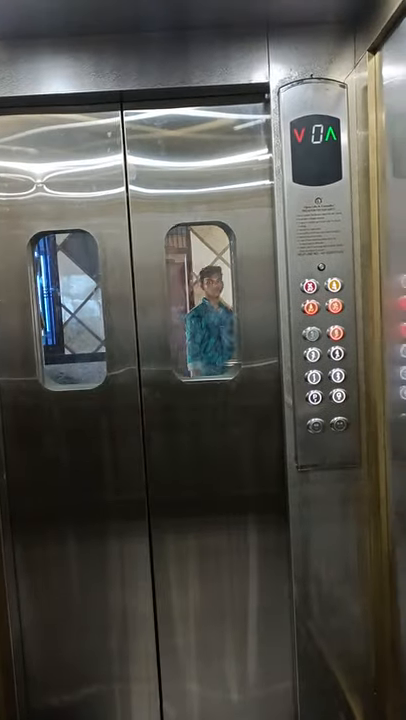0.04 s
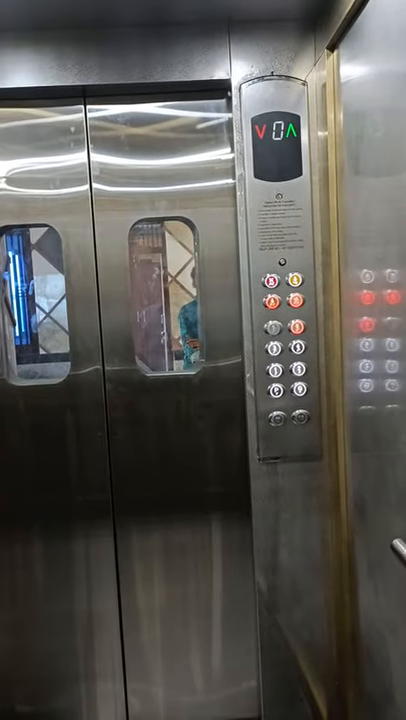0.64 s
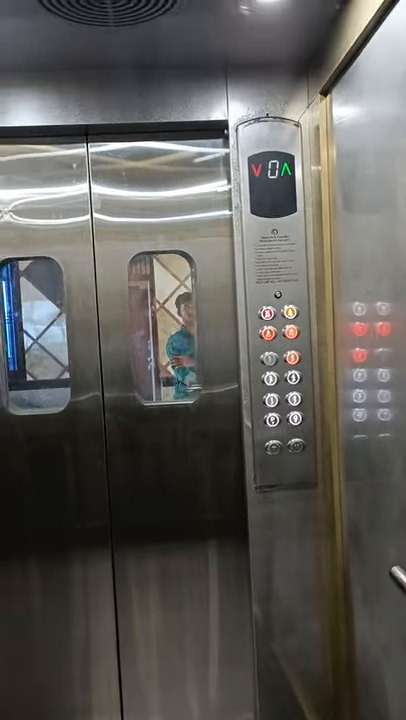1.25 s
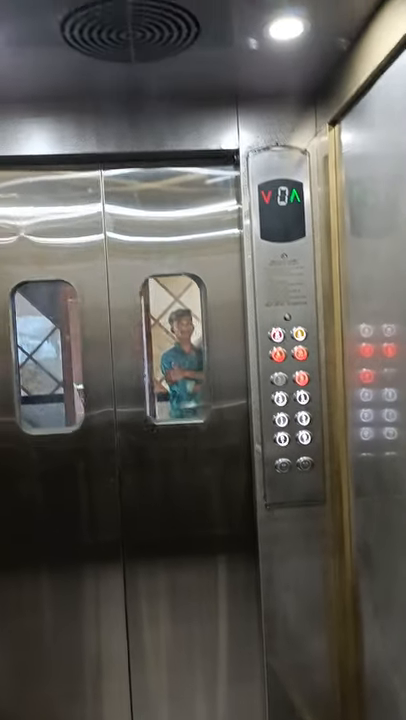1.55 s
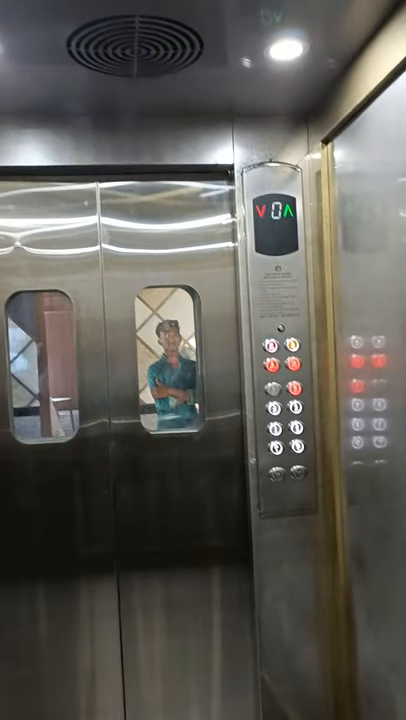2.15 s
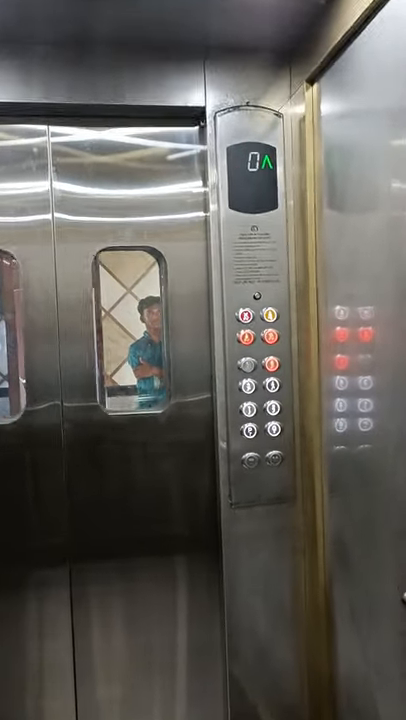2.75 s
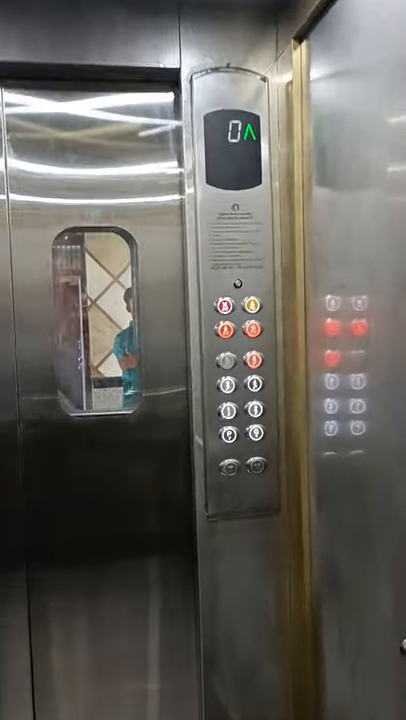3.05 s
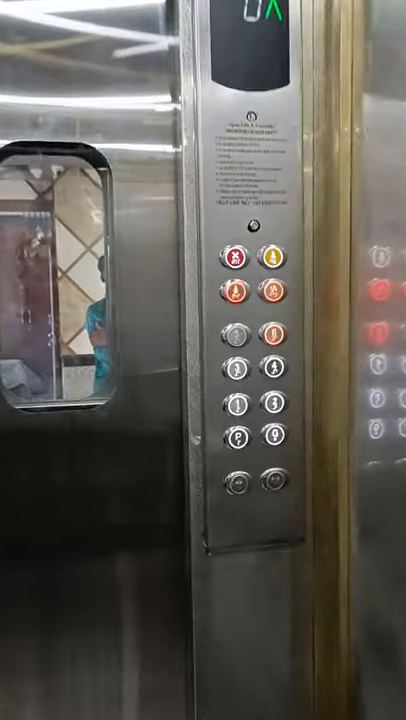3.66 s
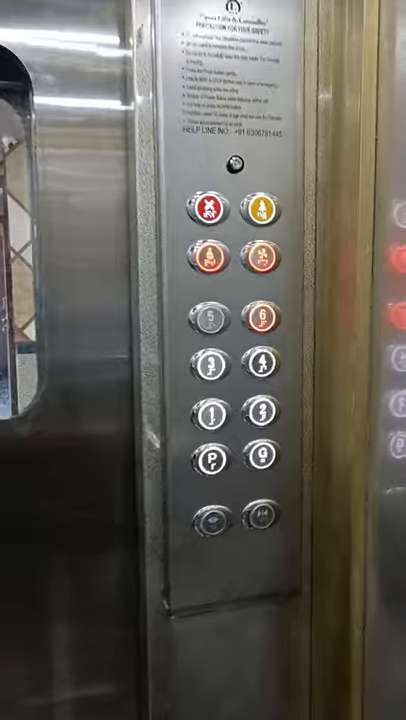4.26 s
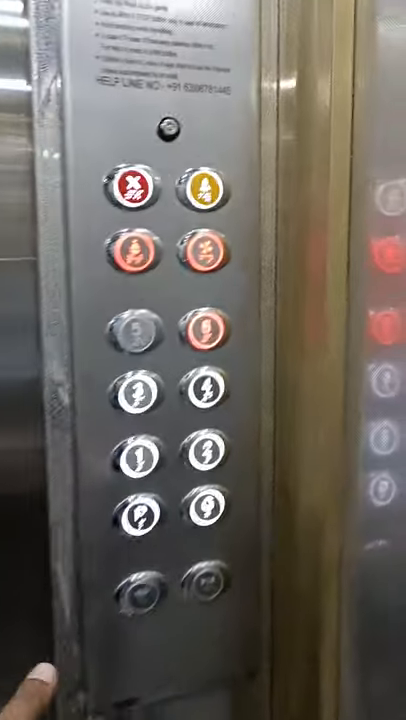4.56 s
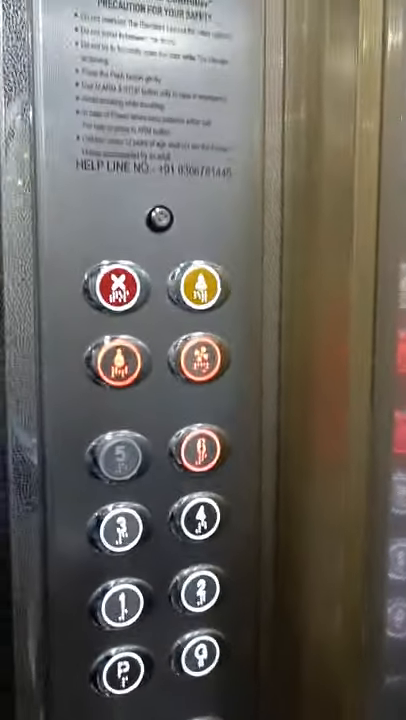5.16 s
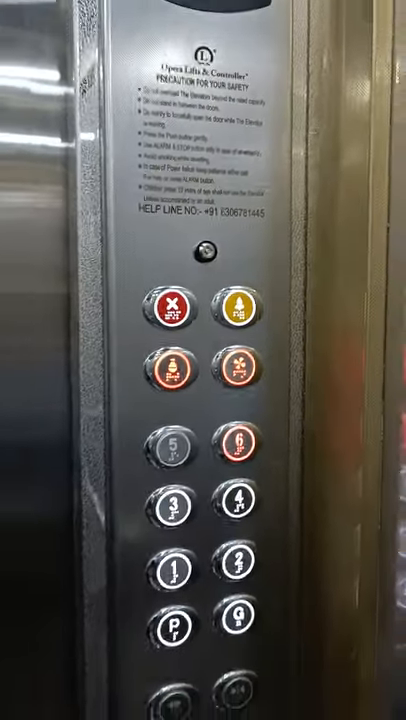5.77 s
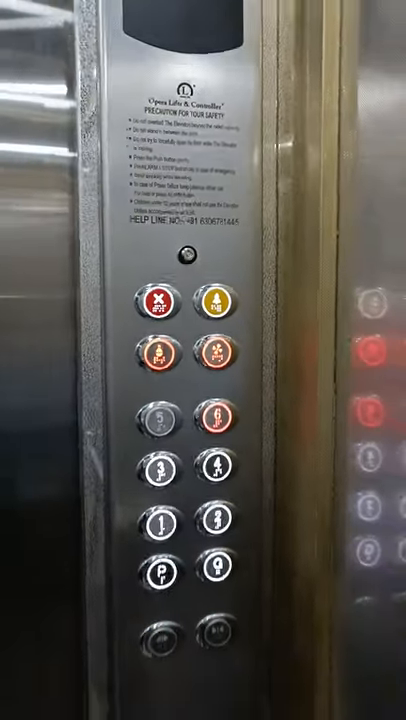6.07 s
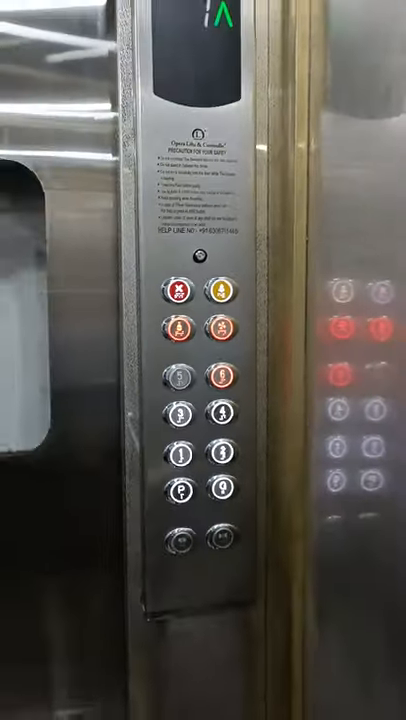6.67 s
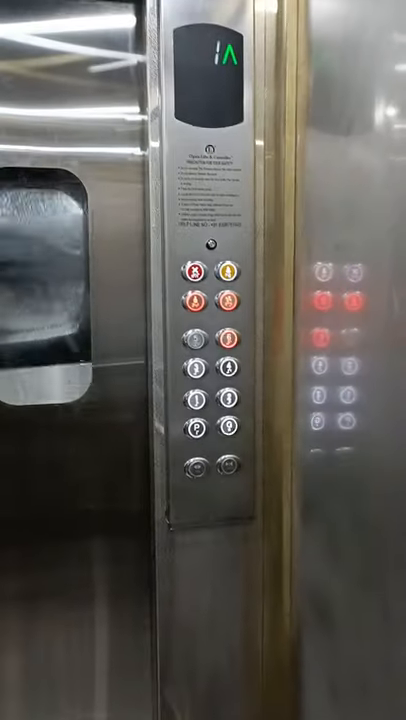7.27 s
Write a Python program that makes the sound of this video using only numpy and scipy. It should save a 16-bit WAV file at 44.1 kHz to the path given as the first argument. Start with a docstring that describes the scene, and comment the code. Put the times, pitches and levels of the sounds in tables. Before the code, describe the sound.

Inside a moving elevator, a low hum and rumble grow louder midway, joined by a couple of sharp ticks and brief clothing rustles.

```python
"""Inside a rising lift car

A motor hums at twice the mains frequency, with side tones from its rotation. The ride excites the
resonances of the small steel cabin, which rumbles while air rushes and hisses. The car shudders a
few times, knocks softly and squeaks once. Light impacts tick on the metal, and friction in
clothing makes rustles and short swishes, two of them close and loud."""
import sys
import numpy as np
from scipy import signal
from scipy.fft import rfft, irfft, next_fast_len
from scipy.io import wavfile

SR = 44100
rng = np.random.default_rng(int(sys.argv[2]) if len(sys.argv) > 2 else 0)


def inscribe(sig):
    """Save sig as 16-bit PCM at rate SR to the path in sys.argv[1].

    A 1-D sig is mono; a 2-D sig holds one channel per row.
    Samples are clipped to [-1, 1] before scaling.
    """
    pcm = np.round(np.clip(np.atleast_2d(sig).T, -1, 1) * 32767)
    wavfile.write(sys.argv[1], SR, pcm.astype(np.int16))


N = 326781
TIME = np.arange(N) / SR
SIZE = next_fast_len(N, True)
BINS = np.maximum(np.arange(SIZE // 2 + 1) * SR / SIZE, 1)   # f/Hz

# magnetic hum of the motor: t/s, level/dB
HUM_LEVEL = [(0.1, -25), (1.37, -25), (1.73, -27), (2.78, -26.5), (3.16, -24), (3.26, -26.5), (4.57, -23),
             (5.68, -18), (6.1, -20), (6.48, -29.5), (6.56, -26), (7.33, -24.5)]
# its weak overtones: harmonic number, level/dB relative to the hum
HUM_HARMONICS = [(2, -46), (3, -50)]
# upper side tone of the rotation: t/s, level/dB
UPPER_TONE_LEVEL = [(0, -44), (.7, -45), (1.5, -39.5), (2.15, -41), (2.75, -48.5), (3.45, -49.5),
                    (3.8, -43), (4.8, -37), (5.25, -38), (5.62, -32.5), (6.15, -42), (7.4, -41)]
# shudders of the car, which swell the lower side tone: t/s, peak level/dB
SHUDDER_PEAKS = [(0.6, -39.5), (0.87, -33.5), (2.27, -47), (2.73, -38.5)]
# two close machine notes that beat: t/s, level/dB
PAIR_LEVEL = [(0, -45), (0.7, -48), (0.95, -44), (1.9, -45.5), (2.4, -40.5), (2.65, -45.5), (4.25, -48.5),
              (4.7, -40), (5.55, -46.5), (6.5, -44), (7.4, -51)]
# rumble of the ride along the rails: t/s, relative level/dB
RUMBLE_LEVEL = [(0, -44.5), (0.35, -47), (0.85, -40.5), (2.1, -44), (4.22, -34.5), (4.5, -26), (4.95, -30),
                (5.35, -27), (5.7, -34), (6.35, -30.5), (6.65, -34), (7.4, -39.5)]
# cabin resonances: f/Hz, width/Hz, relative level/dB
RUMBLE_MODES = [(135, 31, -7.5), (164, 11, -0.5), (191.9, 16, 1), (204, 17, -2.5), (235.3, 34, -9.5),
                (270, 20, -16)]
# wall panel resonances: f/Hz, width/Hz, relative level/dB
WALL_MODES = [(324.3, 8.5, -3), (353.4, 8.6, 0), (380.7, 8.1, 2.5), (428, 11.8, 3.5), (857, 26, -11.5),
              (1229, 110, -15)]
# resonances of the hollow drone: f/Hz, width/Hz, relative level/dB
HOLLOW_MODES = [(512.5, 9.4, 3.5), (546, 8.6, 1.5)]
# moving air: f/Hz, relative spectral level/dB
AIR_SPECTRUM = [(20, -9), (48, -0.5), (65, 6), (130, 9), (240, 1), (340, 1.5), (470, -8), (560, -5.5),
                (660, -8.5), (1000, -13.5), (1600, -20), (2200, -20.5), (3000, -28.5), (4100, -27),
                (5600, -41.5), (10500, -47), (16000, -54)]
# thin hiss: f/Hz, relative spectral level/dB
HISS_SPECTRUM = [(5000, -23), (6100, -19), (6700, -8.5), (7400, -11.5), (7950, -4), (8400, -1), (9100, 1),
                 (9500, -9.5), (9900, -26), (13000, -43)]
# whistling edge of the hiss: t/s, level/dB
WHISTLE_LEVEL = [(0, -63.5), (2.25, -61.5), (2.6, -78.5), (4.5, -74.5), (6.1, -61.5), (7.4, -62)]
# rustling creases: f/Hz, relative spectral level/dB
RUSTLE_SPECTRUM = [(2000, -15), (3000, 1.5), (5500, -9.5), (7200, 3), (9000, -4), (10800, -7.5),
                   (15500, -19.5)]
# creases giving way: t/s, peak level/dB
CREASE_PEAKS = [(.22, -60), (2.83, -63), (2.98, -59), (3.16, -56), (3.32, -60.5), (3.57, -60), (3.67, -61),
                (5.96, -56.5), (6.6, -62), (7.28, -55.5)]
# dull panel rattle of the knock: f/Hz, width/Hz, relative level/dB
RATTLE_MODES = [(340, 120, 0.5), (550, 120, -4), (800, 270, -13.5)]
# strokes of cloth: start t/s, rise/s, length/s, level/dB, tilt/(dB per octave)
STROKES = [(0.503, .02, .07, -58, -1), (3.65, .005, .05, -55.5, -2.5), (4.071, .011, 0.12, -35.5, -1),
           (4.354, 0.018, .085, -56, 2), (4.721, 0.084, 0.23, -31.5, 1), (5.37, 0.062, 0.15, -44.5, -4),
           (5.787, .014, .075, -47.5, 3), (6.093, .025, 0.089, -57, 1), (6.196, .026, 0.11, -54.5, 0.5),
           (6.713, 0.023, 0.085, -44.5, -0.5), (6.8, .016, .061, -49.5, -1.5), (7.067, .015, .08, -55, 3.5)]
# sliding cloth: f/Hz, relative spectral level/dB
CLOTH_SPECTRUM = [(500, -17), (1100, -5.5), (1800, -5), (2170, 0), (2550, -2.5), (3300, 0), (4100, 2.5),
                  (4650, -2), (5800, -8), (6700, -7), (7400, -2), (8000, -2), (8600, -13), (9700, -9.5),
                  (15500, -16)]
# resonances of rubbing metal: f/Hz, width/Hz, relative level/dB
RUBBING_MODES = [(4285, 300, -1.5), (5100, 250, -0.5), (5800, 300, -3), (6100, 300, -4.5),
                 (7500, 3500, -9.5)]
# light contacts on the metal: t/s, relative level/dB
CONTACTS = [(0.905, -63), (3.651, -41.5), (3.658, -41), (4.072, -32), (4.099, -34), (5.804, -59),
            (6.235, -57.5)]
# clusters of close modes in the struck part: f/Hz, width/Hz, relative level/dB, T60/s
STRUCK_MODES = [(2070, 160, -9.5, 0.18), (3260, 400, -9.5, 0.044), (4070, 320, 0.5, 0.073),
                (4630, 450, -5.5, 0.087), (6900, 2000, -16.5, .02)]
# cabin field, coherent in the bass and diffuse above: f/Hz, side minus mid level/dB
FIELD_WIDTH = [(60, -19), (200, -14.5), (380, -8), (700, -2.5), (1290, 2), (2400, -0.5), (16000, 1.5)]
# unequal resonances of two microphone ports: f/Hz, left minus right level/dB
PORT_BALANCE = [(100, 2), (200, -0.4), (400, 0.2), (1200, -0.1), (2300, 2.5), (4100, -2.5), (5700, 1.5),
                (6500, 9.5), (7500, 25), (8800, 15), (9700, 11), (11000, 6), (14000, 2)]


def from_db(db):
    """Amplitude grows tenfold for every 20 dB."""
    return 10 ** (np.asarray(db) / 20)


def rms_one(x):
    """Division by the RMS amplitude gives unit power."""
    return x / np.sqrt(np.mean(x ** 2) + 1e-20)


def in_time(rows):
    """Linear interpolation gives a level/dB at every sample."""
    return np.interp(TIME, *np.transpose(rows))


def over_hz(points):
    """Interpolation of level over log frequency gives a gain for every bin."""
    hz, db = np.transpose(points)
    return from_db(np.interp(np.log(BINS), np.log(hz), db))


def coloured(x, gain):
    """Filtering multiplies the spectrum by a gain."""
    return irfft(rfft(x.astype(np.float32), SIZE) * gain.astype(np.float32), SIZE)[..., :N]


def resonance(hz, width):
    """A resonator's response, 1 at its natural frequency, falls steeply on either side."""
    return 1 / (1 + ((BINS ** 2 - hz ** 2) / (BINS * width * np.pi / 2)) ** 2)


def drift(rate_hz):
    """Low-passed noise gives a random fluctuation of unit spread."""
    t = np.arange(8192) / 1000
    hz = np.arange(len(t) // 2 + 1) / t[-1]
    spectrum = rfft(rng.standard_normal(len(t))) / (1 + (hz / rate_hz) ** 2)
    return np.interp(TIME, t, rms_one(irfft(spectrum)))


def swell(peak_s, rise_s, fall_s):
    """A Gaussian rise to 1 is followed by exponential decay."""
    age = TIME - peak_s
    return np.exp(-(np.minimum(age, 0) / rise_s) ** 2 - np.maximum(age, 0) / fall_s)


def tone(hz, wander_hz):
    """Phase is the integral of frequency: a unit-power sine of wandering pitch."""
    return np.sqrt(2) * np.sin(2 * np.pi * np.cumsum(hz + wander_hz * drift(1.63)) / SR)


def cabin_noise(gain):
    """Noise in a diffuse field is alike at both ears only at long wavelengths."""
    mid, side = coloured(rng.standard_normal((2, N)), gain)
    return rms_one(mid + coloured(side, over_hz(FIELD_WIDTH)) * [[1], [-1]])


def shaken(modes, level_db, flutter_db):
    """Randomly excited modes add in power."""
    response = np.sqrt(sum((from_db(db) * resonance(hz, width)) ** 2 for hz, width, db in modes))
    return from_db(level_db + flutter_db * drift(13)) * cabin_noise(response)


def reverberate(x, wet_db, t60_s=0.4):
    """Reflections from close steel walls merge into an exponentially decaying tail."""
    t = TIME[:SR // 2]
    tail = rng.standard_normal((2, len(t))) * from_db(-60 * t / t60_s) * (t > .003)
    tail /= np.sqrt(np.sum(tail ** 2, axis=1, keepdims=True))
    wet = from_db(wet_db)
    return (x + wet * signal.fftconvolve(x, tail, axes=1)[:, :N]) / np.sqrt(1 + wet ** 2)


def motor(hum_db, hum_hz=100.09, turn_hz=23.58, note_hz=259.4, beat_hz=6.2):
    """Rotation modulates the magnetic hum into side tones; two close notes beat by interference."""
    hum = tone(hum_hz, wander_hz=0.085)
    hum += sum(from_db(db) * tone(k * hum_hz, wander_hz=0.36) for k, db in HUM_HARMONICS)
    shudder = sum(from_db(db) * swell(s, rise_s=.05, fall_s=.067) for s, db in SHUDDER_PEAKS)
    lower = (from_db(-49 + 2.5 * drift(1.9)) + shudder) * tone(hum_hz - turn_hz, wander_hz=0.53)
    upper = from_db(in_time(UPPER_TONE_LEVEL)) * tone(hum_hz + turn_hz, wander_hz=0.23)
    pair = tone(note_hz, wander_hz=0.63) + from_db(-9) * tone(note_hz + beat_hz, wander_hz=1.17)
    pair *= from_db(in_time(PAIR_LEVEL) + 2.0 * drift(4.5))
    left = from_db(hum_db) * hum + lower + upper + pair
    right = np.interp(TIME - .00042, TIME, left)   # the sound reaches the left side first
    return np.array([left, right])


def cabin_vibration(hum_db, rush_db):
    """Forced vibration: the rumble follows the ride, the panels the air, a hollow drone the motor."""
    rumble = shaken(RUMBLE_MODES, in_time(RUMBLE_LEVEL) - 4.5, flutter_db=1.5)
    panels = shaken(WALL_MODES, rush_db - 9.5, flutter_db=2.0)
    drone = shaken(HOLLOW_MODES, -58.5 + 1.33 * (hum_db - hum_db.mean()), flutter_db=2.3)
    return rumble + panels + drone


def air(rush_db):
    """Airflow gives broadband rush and hiss; narrow noise bands sound as a whistle and a faint whine."""
    noise = cabin_noise(over_hz(AIR_SPECTRUM))
    dull = coloured(noise, 1 / (1 + (BINS / 1500) ** 2))
    treble_db = 0.62 * rush_db + 0.38 * np.mean(rush_db)   # the top varies less than the low part
    rush = from_db(3) * (from_db(rush_db) * dull + from_db(treble_db) * (noise - dull))
    hiss = from_db(-61 + .5 * drift(4.9)) * cabin_noise(over_hz(HISS_SPECTRUM))
    whistle = from_db(in_time(WHISTLE_LEVEL)) * cabin_noise(resonance(hz=7950, width=290))
    whine_gain = from_db(-86.5) + from_db(-75.5) * swell(peak_s=2.2, rise_s=.25, fall_s=.25)
    whine = whine_gain * cabin_noise(resonance(hz=14300, width=90))
    return rush + hiss + whistle + whine


def rustles(patchy_db=4.5, grain_db=2.5):
    """Creases shift constantly and now and then give way; as incoherent sources they add in power."""
    level_db = np.interp(TIME, [2.7, 3.0], [-78.5, -66.5])   # livelier once the person moves
    shifting = from_db(level_db) * rms_one(from_db(patchy_db * np.clip(drift(14), -2, 2)))
    giving = sum(from_db(db) * swell(s, rise_s=.041, fall_s=.046) for s, db in CREASE_PEAKS)
    grains = rms_one(from_db(grain_db * drift(150)) * cabin_noise(over_hz(RUSTLE_SPECTRUM)))
    return np.hypot(shifting, giving) * grains


def knock():
    """A soft impact of the car on its guides excites damped panel modes."""
    envelope = swell(peak_s=.55, rise_s=.041, fall_s=.17)
    return envelope * shaken(RATTLE_MODES, level_db=-44, flutter_db=2.5)


def swishes(grain_db=1.5, body_hz=2600, lag_share=0.37, release_share=0.37):
    """Stick-slip friction of many fibres makes grainy noise; each stroke starts bright, then fills out."""
    friction = coloured(rng.standard_normal((2, N)), over_hz(CLOTH_SPECTRUM))
    friction *= from_db(grain_db * drift(180))
    out = np.zeros((2, N))
    for start, rise, length, level_db, tilt_db in STROKES:
        lag = lag_share * rise
        at = np.flatnonzero((TIME >= start) & (TIME <= start + length + lag))
        age = TIME[at] - start
        envelope = np.clip(np.minimum(age / rise, (length - age) / (release_share * length)), 0, 1)
        late_envelope = np.interp(age - lag, age, envelope)
        hz = np.maximum(np.arange(len(at) // 2 + 1) * SR / len(at), 1)
        edge_hz = 1620 - 23 * (level_db + 45)   # a firmer stroke reaches deeper
        colour = from_db(tilt_db * np.log2(hz)) / np.sqrt(1 + (edge_hz / hz) ** 8)
        stroke = rms_one(irfft(rfft(friction[:, at]) * colour, len(at)))
        body = irfft(rfft(stroke) / (1 + (hz / body_hz) ** 4), len(at))
        out[:, at] += from_db(level_db) * (envelope * (stroke - body) + late_envelope * body)
    return reverberate(out, wet_db=-3.0)


def squeak():
    """Friction briefly excites high resonances in rubbing metal."""
    envelope = swell(peak_s=.9, rise_s=.012, fall_s=.045)
    return envelope * shaken(RUBBING_MODES, level_db=-52, flutter_db=2.5)


def ticks():
    """Each impact leaves the same small metal part in free, exponentially damped vibration."""
    impulses, ringing = np.zeros(N), np.zeros((2, N))
    for s, level_db in CONTACTS:
        impulses[round(s * SR)] = from_db(level_db)
    for hz, width, db, t60 in STRUCK_MODES:
        decay = from_db(-60 / (t60 * SR))
        envelope = signal.lfilter([1], [1, -decay], impulses + 1e-18)
        ringing += from_db(db) * envelope * cabin_noise(resonance(hz, width))
    pan = from_db([[-4], [-3]])   # a little to the right
    return reverberate(pan * ringing, wet_db=-3.5)


def scene():
    """By superposition, the pressures of all sources in the car add."""
    hum_db = in_time(HUM_LEVEL)
    rush_db = -45 + 0.92 * np.maximum(TIME - 3.87, 0)   # grows from the middle of the ride on
    ride = motor(hum_db) + cabin_vibration(hum_db, rush_db) + air(rush_db)
    return ride + rustles() + knock() + swishes() + squeak() + ticks()


def record(dry, cutoff_hz=15720):
    """Port resonances divide the power unevenly between left and right; a low-pass cuts the top."""
    ratio = over_hz(PORT_BALANCE)
    ports = np.array([ratio, np.ones_like(ratio)]) * np.sqrt(2 / (1 + ratio ** 2))
    low_pass = signal.ellip(12, .1, 80, cutoff_hz, fs=SR, output="sos")
    return signal.sosfilt(low_pass, coloured(dry, ports))


dry = scene()
out = record(dry)
inscribe(out)
```